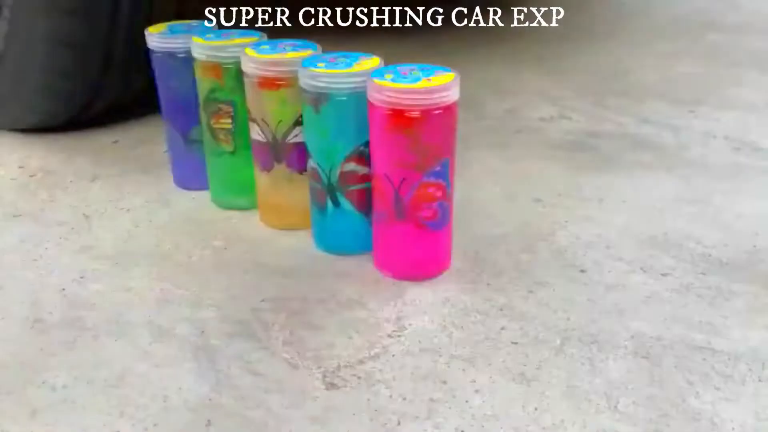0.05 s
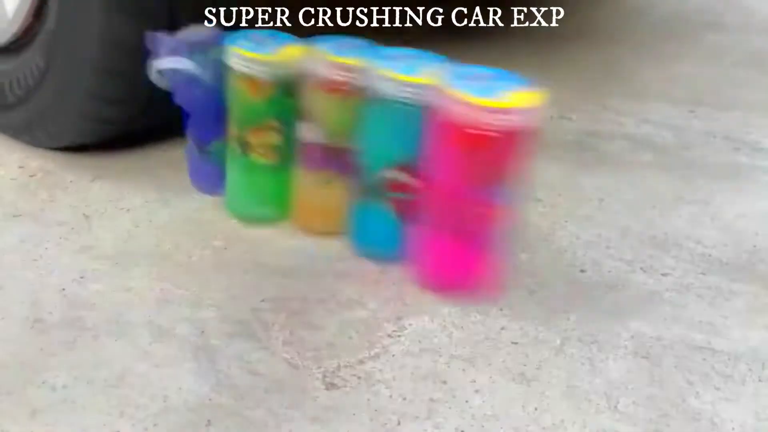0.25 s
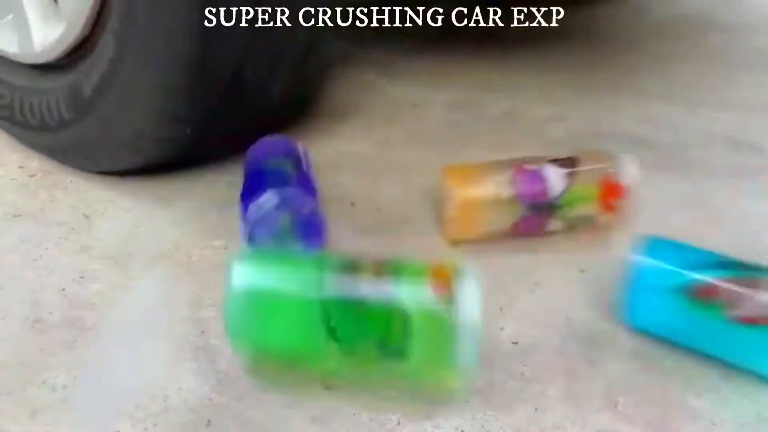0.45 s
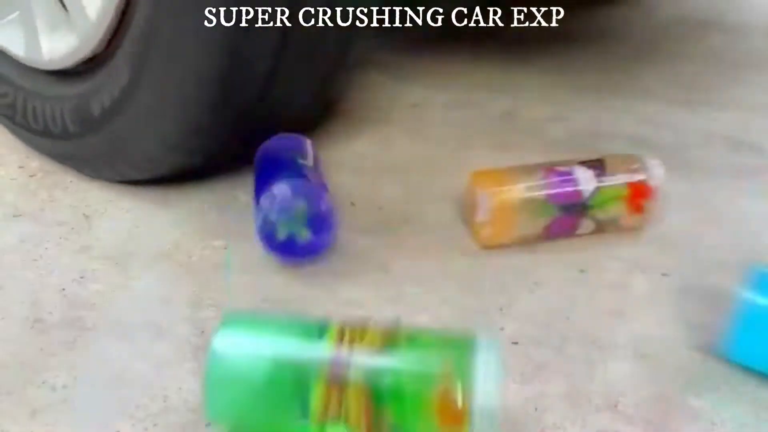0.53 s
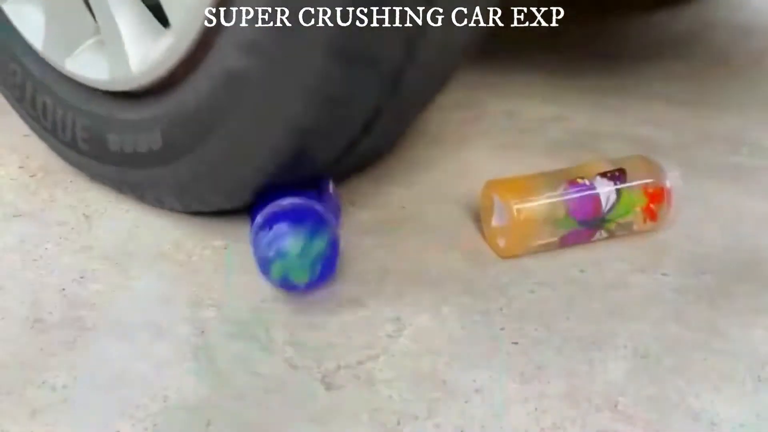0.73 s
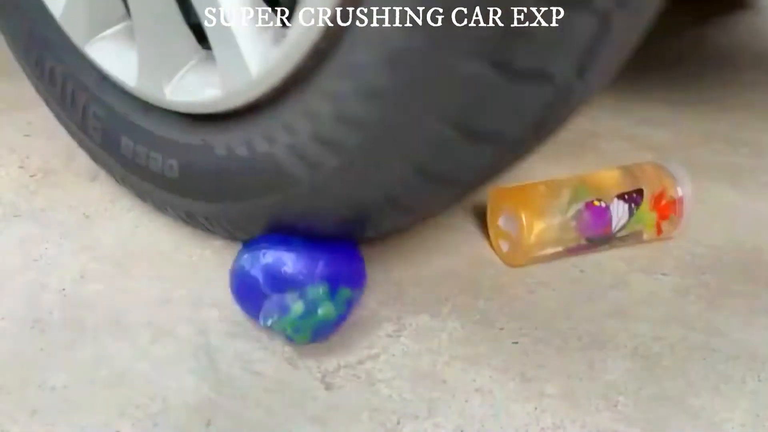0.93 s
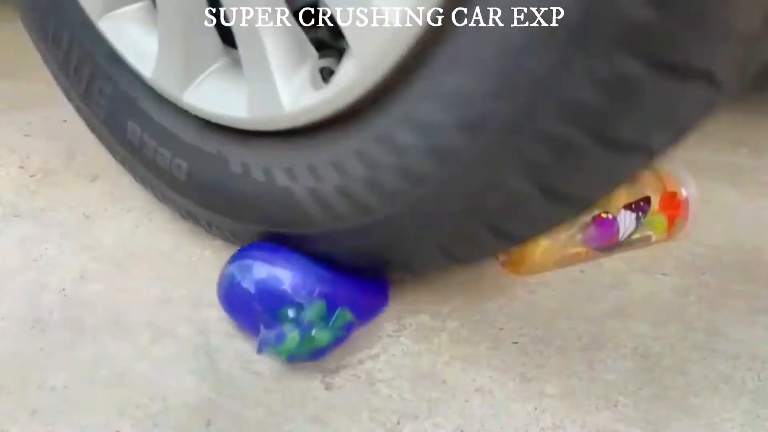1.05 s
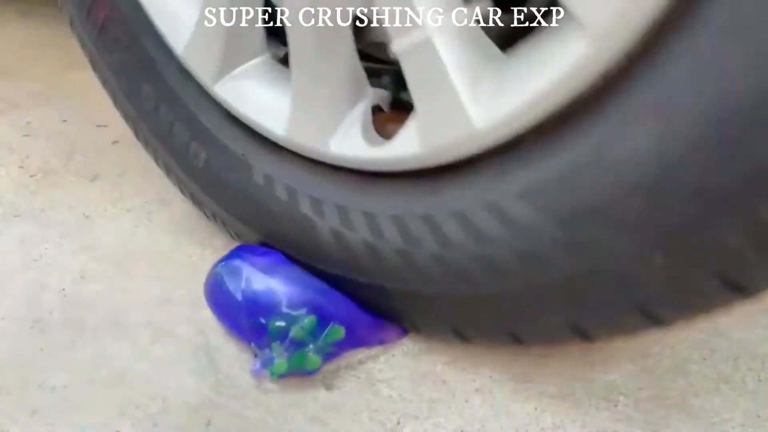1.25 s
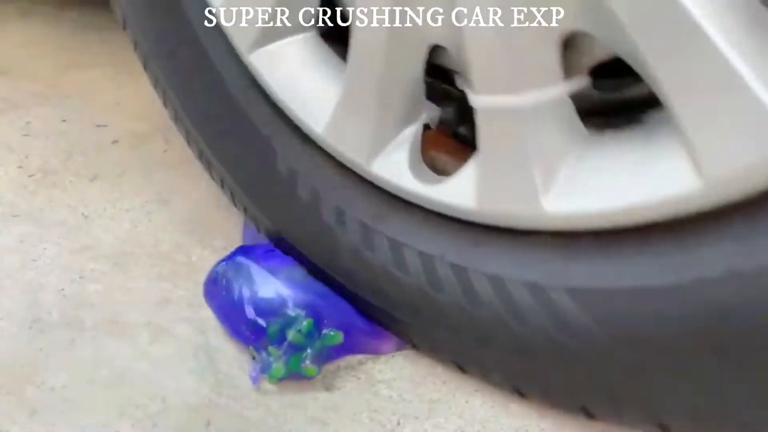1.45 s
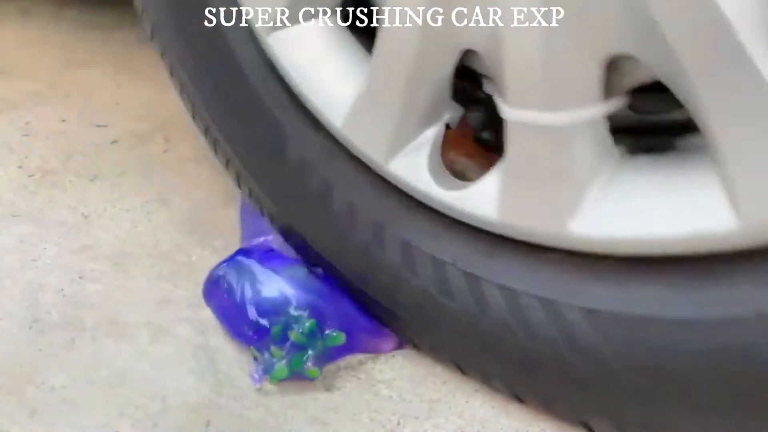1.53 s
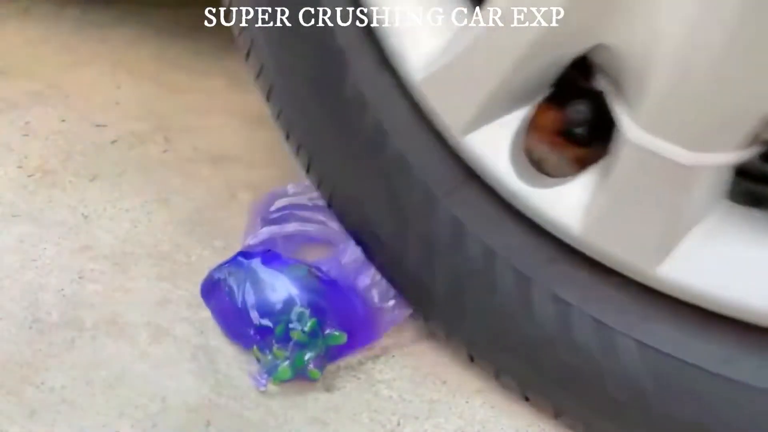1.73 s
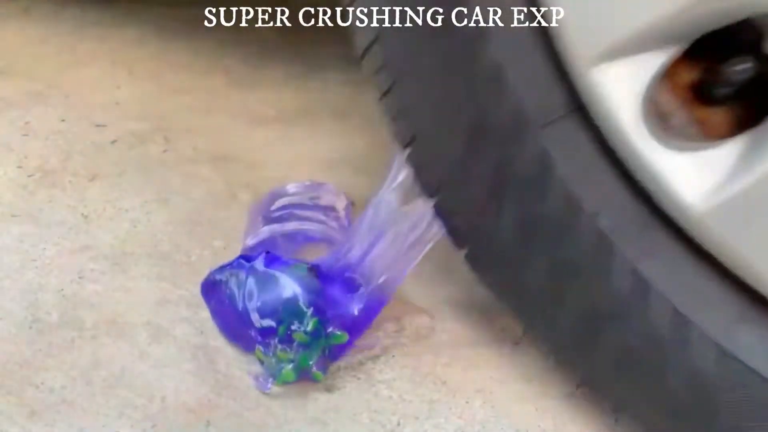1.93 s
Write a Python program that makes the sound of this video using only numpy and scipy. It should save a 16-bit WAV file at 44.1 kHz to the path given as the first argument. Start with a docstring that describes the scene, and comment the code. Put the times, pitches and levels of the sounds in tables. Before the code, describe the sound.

Plastic tubes crack, pop and squelch as a car tyre rolls over them.

```python
"""A tyre crushing gel-filled tubes

A car tyre thumps and rumbles over plastic tubes on concrete, close by, while the engine idles quietly.
The shells snap and knock, and trapped air shrieks out of split seals.
The gel spatters, flutters through a slit and pops."""
import sys
import numpy as np
from scipy import signal
from scipy.fft import rfft, irfft
from scipy.io import wavfile

SR = 44100
rng = np.random.default_rng(int(sys.argv[2]) if len(sys.argv) > 2 else 0)


def store_pcm(level_fs):
    """Save levels as 16-bit WAV."""
    pcm = np.round(np.clip(level_fs, -1, 1) * 32767).astype(np.int16)
    wavfile.write(sys.argv[1], SR, np.atleast_2d(pcm).T)


N = 88200
BLOW_SAMPLES = SR // 4
T = np.arange(N) / SR
HZ = np.maximum(np.fft.rfftfreq(N, 1 / SR), 1)

# Tone of droplets and grit: frequency_hz, level_db
PATTER_TONE = [(150, -8), (500, 0), (1100, -4), (1700, -1), (2600, 2.5), (4000, 0), (6000, -1), (7500, -4),
               (8900, 3), (10500, -4), (16000, -8)]
# Stereo width, sides against middle: frequency_hz, side_db
STEREO_WIDTH = [(40, -12), (130, -11), (400, -13), (2000, -18), (5000, -12), (14000, -11)]


def amp(db):
    """Decibels to gain."""
    return 10 ** (np.asarray(db) / 20)


def unit(x):
    """Scale to an average (rms) strength of 1."""
    return x / np.sqrt(np.mean(x ** 2) + 1e-20)


def gains(points, at=HZ):
    """A tone curve as a gain for every frequency."""
    hz, db = np.transpose(points)
    return amp(np.interp(np.log(at), np.log(hz), db))


def level(points):
    """A level curve as a gain for every sample."""
    return amp(np.interp(T, *np.transpose(points)))


def tilt(db_per_octave):
    """Brighten or dull the tone above 500 Hz."""
    return amp(db_per_octave * np.log2(np.maximum(HZ, 500) / 4000))


def colour(pair, gain):
    """Shape two unrelated signals into fairly narrow stereo."""
    mid, side = irfft(rfft(pair) * gain * [np.ones_like(HZ), gains(STEREO_WIDTH)], N)
    return unit(np.array([mid + side, mid - side]))


def noise(gain):
    """Stereo noise with a given tone."""
    return colour(rng.standard_normal((2, N)), gain)


def clicks(per_s, spread_db):
    """Random clicks of uneven size, as a pair."""
    sizes = amp(spread_db * np.minimum(rng.exponential(1, N), 4))
    happens = rng.random(N) < per_s / SR
    return unit(sizes * happens * rng.choice([-1, 1], (2, N)))


def decay(t, fade_s):
    """Silent before t = 0, then falling 60 dB every fade_s."""
    return (t >= 0) * np.exp(-np.log(1000) * np.clip(t / fade_s, 0, 10))


def swell(start_s, rise_s, hold_s, fade_s, db):
    """A level that rises, holds and fades."""
    rise = np.clip((T - start_s) / rise_s, 0, 1) ** 2
    return amp(db) * rise * decay(np.maximum(T - start_s - rise_s - hold_s, 0), fade_s)


def resonate(x, hz, width_hz):
    """Let a sound ring around one pitch."""
    r = np.exp(-np.pi * width_hz / SR)
    feedback = [1, -2 * r * np.cos(2 * np.pi * hz / SR), r * r]
    return signal.lfilter(np.array([1, 0, -1]) * (1 - r * r) / 2, feedback, x + 1e-18)


def add(out, start_s, sound):
    """Lay a short sound into the mix."""
    start = max(int(start_s * SR), 0)
    out[..., start:start + BLOW_SAMPLES] += sound[..., :N - start]


def burst(tone, centre_hz, fade_s, rise_s=.0005, hold_s=.0007):
    """A dying puff of noise; centre_hz scales the frequencies of its tone."""
    t = T[:BLOW_SAMPLES]
    hz = np.maximum(np.fft.rfftfreq(BLOW_SAMPLES, 1 / SR), 1)
    spectrum = rfft(rng.standard_normal((2, BLOW_SAMPLES))) * gains(tone, hz / centre_hz)
    mid, side = irfft(spectrum * [np.ones_like(hz), gains(STEREO_WIDTH, hz)], BLOW_SAMPLES)
    shape = np.minimum(t / rise_s, 1) * decay(np.maximum(t - hold_s, 0), fade_s)
    return unit(np.array([mid + side, mid - side]) * shape) * np.sqrt(np.mean(shape ** 2))


def ring(hz, fade_s):
    """One struck note dying away."""
    t = T[:BLOW_SAMPLES]
    return np.sin(2 * np.pi * hz * t) * decay(t, fade_s)


def yard(x, delay_s=.004):
    """Sound bounces off the car and the yard, leaving a faint, dull tail."""
    echoes = [(.06, -13, -2), (.3, -24, -2)]  # reflections: fade_s, level_db, tilt_db_per_octave
    tail = 0
    for fade_s, db, slope in echoes:
        echo = unit(noise(tilt(slope)) * decay(T - delay_s, fade_s))
        tail += amp(db) * echo * np.sqrt(np.mean(tilt(slope) ** 2) / N)
    return signal.fftconvolve(x, tail, axes=1)[:, :N]


def engine():
    """The idling engine fills the yard with quiet, low noise."""
    loudness = [(0, -49), (.13, -47), (.3, -38), (.42, -42), (.6, -39), (.8, -40), (1.2, -39), (1.6, -37),
                (1.8, -39), (2, -39)]  # idle level: time_s, level_db
    tone = [(20, -16), (45, -8), (80, 0), (130, -8), (250, -16), (600, -21), (1100, -30), (1800, -28),
            (4000, -33), (10000, -38), (16000, -44)]  # idle tone: frequency_hz, level_db
    return level(loudness) * noise(gains(tone))


def tyre(drone_hz=43, wander_share=.08, rumble_db=-7):
    """The loaded tyre drones and rumbles as grit crunches under its tread."""
    roll_level = [(0, -70), (.6, -54), (.68, -35), (.8, -42), (.88, -27), (.94, -26), (.99, -18),
                  (1.04, -27), (1.1, -21), (1.16, -31), (1.23, -28), (1.32, -42), (1.45, -58), (2, -60)]  # rolling: time_s, level_db
    rumble_tone = [(20, -8), (45, 0), (90, -1), (160, -14), (400, -24), (1500, -45), (16000, -80)]  # rumble: frequency_hz, level_db
    grit_level = [(0, -62), (.2, -60), (.5, -48), (.72, -48), (.87, -50), (1.05, -45), (1.13, -52),
                  (1.6, -45), (1.75, -48), (1.88, -54), (2, -56)]  # crunching: time_s, level_db
    wander = noise(1 / (1 + (HZ / 10) ** 4))[0]
    pitch_hz = drone_hz * (1 + wander_share * wander)
    drone = np.sqrt(2) * np.sin(2 * np.pi * np.cumsum(pitch_hz) / SR)
    grit = level(grit_level) * colour(clicks(per_s=700, spread_db=4.5), gains(PATTER_TONE))
    return level(roll_level) * (drone + amp(rumble_db) * noise(gains(rumble_tone))) + grit


def thumps(rise_s=.004):
    """The soft rubber drops on to a tube or the ground."""
    blows = [(.218, -19, 150, .08), (.277, -25, 120, .1), (.327, -14, 104, .13), (.37, -23, 140, .08),
             (.58, -27, 130, .08), (.635, -23, 48, .25), (.665, -29, 190, .12), (.836, -8, 50, .15),
             (.843, -13, 140, .08), (1.06, -20, 100, .07), (1.184, -9, 112, .08), (1.215, -11, 72, .18),
             (1.911, -27, 100, .1)]  # tyre landings: start_s, level_db, pitch_hz, fade_s
    out = np.zeros(N)
    for start_s, db, hz, fade_s in blows:
        add(out, start_s, amp(db) * ring(hz, fade_s) * np.minimum(T[:BLOW_SAMPLES] / rise_s, 1))
    return out


def flutter(flaps_per_s=224, jitter=.07, hiss_db=-6):
    """A wet slit flaps unevenly; each flap rings it and lets out a puff of hiss."""
    shape = (1.386, .012, .02, .14, -25)  # flutter level: start_s, rise_s, hold_s, fade_s, level_db
    slit_notes = [(260, 300, 1), (520, 400, -1), (1050, 500, 0), (1600, 450, -5), (2250, 700, -4)]  # ringing slit: pitch_hz, width_hz, level_db
    hiss_tone = [(1000, -15), (2500, -2), (4000, -2), (5800, 0), (6800, -16), (16000, -28)]  # puffs: frequency_hz, level_db
    times = shape[0] + np.cumsum(1 + jitter * rng.standard_normal(30)) / flaps_per_s
    flaps = np.zeros(N)
    flaps[(times * SR).astype(int)] = amp(rng.normal(0, 2, len(times)))
    body = sum((-1) ** k * amp(db) * resonate(resonate(flaps, hz, width), hz, width)
               for k, (hz, width, db) in enumerate(slit_notes))
    puffs = signal.fftconvolve(flaps, decay(T, fade_s=.012))[:N] * noise(gains(hiss_tone))
    active_share = np.ptp(times) / T[-1]
    return swell(*shape) * (unit(body) + amp(hiss_db) * unit(puffs)) * np.sqrt(active_share)


def spatter(mist_gain=.45):
    """Gel sprays out as dense droplets in a fine mist."""
    sprays = [(.249, .002, .008, .09, -26, 5), (.283, .007, .018, .24, -19, .5),
              (.474, .004, .01, .16, -30, 0), (.555, .01, .02, .08, -34, 0), (.62, .04, .09, .3, -44, 1),
              (1.176, .01, .008, .3, -23, 2), (1.27, .08, .06, .18, -35, -1.5),
              (1.457, .016, .028, .12, -35, 1), (1.59, .008, .008, .2, -38, -2),
              (1.745, .025, .012, .16, -39, 2)]  # spurts: start_s, rise_s, hold_s, fade_s, level_db, tilt_db_per_octave
    drops = clicks(per_s=2200, spread_db=4) + mist_gain * rng.standard_normal((2, N))
    return sum(swell(*shape) * colour(drops, gains(PATTER_TONE) * tilt(slope))
               for *shape, slope in sprays)


def air_jets():
    """Trapped air hisses through split seals and whistles at their edges."""
    # Each jet's level: start_s, rise_s, hold_s, fade_s, level_db
    # Its hiss: frequency_hz, level_db. Its whistles: pitch_hz, width_hz, level_db
    shriek = (.2322, .001, .0148, .025, -7.5)
    shriek_hiss = [(500, -38), (1200, -28), (2700, -10), (3900, -22), (5300, -11), (7000, -13), (8600, -3),
                   (9700, -7), (11000, -3), (16000, -6)]
    shriek_whistles = [(8560, 130, -3), (8920, 130, -11), (10480, 130, -10), (10830, 120, -8),
                       (13400, 200, -12)]
    blast = (1.143, .022, .005, .06, -8)
    blast_hiss = [(1000, -30), (3300, -24), (4600, -5), (7500, -6), (8900, 0), (10000, -4), (12000, 1),
                  (16000, 1)]
    blast_whistles = [(8850, 250, -12), (13660, 150, -12), (14520, 150, -8), (15080, 200, -8)]
    squirt = (1.345, .008, .009, .06, -11)
    squirt_hiss = [(500, -25), (2000, -16), (3500, -2), (5600, 0), (6600, -12), (8000, -14), (11000, -26),
                   (16000, -32)]
    squirt_whistles = [(4230, 100, -10), (4480, 70, -5), (5370, 80, -2)]
    gurgle = (1.353, .008, .006, .09, -19)  # the squirt turns wet and lower
    gurgle_hiss = [(200, -20), (700, -12), (1100, 0), (2500, 0), (3700, 0), (6000, -14), (16000, -35)]
    gurgle_whistles = [(1550, 80, -9), (2230, 90, -6), (2570, 60, -7)]
    seep = (1.455, .025, .022, .08, -30)  # a last thin leak before the pops
    seep_hiss = [(800, -14), (2400, -7), (4000, -10), (5600, 0), (7200, -2), (9000, -12), (16000, -22)]
    seep_whistles = [(1000, 200, -12), (2300, 250, -11), (6000, 300, -7)]
    jets = [(shriek, shriek_hiss, shriek_whistles), (blast, blast_hiss, blast_whistles),
            (squirt, squirt_hiss, squirt_whistles), (gurgle, gurgle_hiss, gurgle_whistles),
            (seep, seep_hiss, seep_whistles)]
    out = np.zeros((2, N))
    for shape, hiss, whistles in jets:
        tones = sum(amp(db) * noise(1 / (1 + (2 * (HZ - hz) / width) ** 2))
                    for hz, width, db in whistles)
        out += swell(*shape) * unit(noise(gains(hiss)) + tones)
    return out


def hollow(hz, fade_s, notes_db=-2, clatter_db=-5):
    """A hollow tube rings briefly amid a clatter of weaker notes."""
    notes = [(1.0, 0), (2.05, -8)]  # main notes: pitch_ratio, level_db
    clatter = [(.15, -26), (.4, -10), (.7, 0), (1.4, -1), (2.3, -3), (3.2, -15), (6, -30), (20, -60)]  # crowded weaker notes: pitch_ratio, level_db
    ringing = sum((-1) ** k * amp(db + notes_db) * ring(hz * ratio, fade_s / np.sqrt(ratio))
                  for k, (ratio, db) in enumerate(notes))
    return ringing + amp(clatter_db) * burst(clatter, hz, fade_s * 1.25)


def knocks_and_pops(low_cut_hz=170, bounce_db=-18, bounce_s=.0011):
    """Shells knock; gel pockets pop and ring the crushed tube; a ground echo widens them."""
    knocks = [(.1705, -31, 450, .03), (.221, -27, 320, .04), (.3295, -19, 480, .04),
              (.3415, -16, 540, .045), (.3725, -21, 400, .04), (.381, -24, 520, .03),
              (.4322, -11, 480, .035), (.452, -26, 420, .04), (.4692, -7, 460, .04), (.473, -9, 1000, .03),
              (.531, -18, 390, .05), (.555, -23, 600, .02), (.5755, -13, 560, .04), (.61, -12, 720, .018),
              (.671, -24, 440, .05), (.716, -28, 340, .05), (.808, -33, 420, .05), (.838, -26, 320, .09),
              (.922, -21, 310, .04), (1.004, -27, 320, .04), (1.059, -17, 480, .05),
              (1.184, -15, 470, .035), (1.746, -28, 300, .04), (1.7785, -22, 480, .035),
              (1.886, -30, 480, .07)]  # shell knocks: start_s, level_db, pitch_hz, fade_s
    pops = [(1.5006, -4, 680, .028, -26), (1.5115, -15, 600, .04, -33), (1.532, -15, 480, .025, -40),
            (1.5642, 2, 490, .025, -18), (1.638, -21, 330, .035, -44), (1.6552, -4, 400, .026, -15)]  # gel pops: start_s, level_db, pitch_hz, fade_s, tube_db
    tube_notes = [(300, 1, .07), (587, -1, .09), (735, 3, .075), (930, 0, .06), (1005, -3, .06),
                  (1310, -10, .06), (1670, -13, .05), (2055, -12, .06), (2610, -15, .05)]  # crushed tube: pitch_hz, level_db, fade_s
    out = np.zeros((2, N))
    for start_s, db, hz, fade_s in knocks:
        add(out, start_s, amp(db) * hollow(hz, fade_s))
    tube = sum((-1) ** k * amp(db) * ring(hz, fade_s) for k, (hz, db, fade_s) in enumerate(tube_notes))
    for start_s, db, hz, fade_s, tube_db in pops:
        add(out, start_s, amp(db) * hollow(hz, fade_s) + amp(tube_db) * tube)
    out = signal.sosfilt(signal.butter(2, low_cut_hz, "high", fs=SR, output="sos"), out)
    bounce = np.interp(T - bounce_s, T, out.mean(axis=0))
    return out + amp(bounce_db) * bounce * [[1], [-1]]


def snaps():
    """Plastic cracks in bursts of noise with a bright tick on top; a few stiff shards ping."""
    cracks = [(.1705, -47, 1500, -36, .03), (.2215, -42, 2200, -42, .03), (.2322, -15, 5500, -9, .025),
              (.2757, -13, 3000, -5, .018), (.2797, -29, 3000, -14, .015), (.3085, -19, 2800, -26, .015),
              (.3593, -26, 3500, -17, .015), (.381, -29, 2500, -27, .035), (.4318, -19, 3800, -10, .015),
              (.4348, -20, 3800, -11, .015), (.4382, -24, 2500, -19, .015), (.452, -31, 2600, -29, .03),
              (.4688, -18, 2200, -16, .025), (.473, -16, 3000, -6, .022), (.4812, -26, 2500, -20, .04),
              (.5303, -19, 3200, -9, .015), (.5385, -37, 3000, -30, .04), (.5545, -16, 3000, -13, .018),
              (.5653, -17, 3000, -14, .015), (.575, -20, 3800, -13, .025), (.586, -36, 3000, -32, .02),
              (.6098, -8, 3000, -15, .012), (.6151, -20, 4500, -11, .012), (.6622, -27, 4300, -41, .012),
              (.671, -41, 4000, -35, .04), (.7154, -37, 2500, -39, .02), (.7484, -26, 5400, -23, .022),
              (.7825, -35, 4000, -28, .012), (.788, -36, 4000, -34, .012), (.8072, -36, 3000, -34, .012),
              (.832, -38, 3000, -29, .04), (.89, -42, 4000, -26, .012), (.921, -39, 1800, -47, .03),
              (1.0582, -19, 3600, -20, .018), (1.098, -30, 5000, -39, .01), (1.1838, -13, 3500, -8, .016),
              (1.195, -23, 3000, -25, .04), (1.254, -29, 2500, -27, .04), (1.276, -28, 5000, -32, .06),
              (1.2985, -24, 4500, -33, .02), (1.3045, -21, 2800, -42, .012), (1.3235, -27, 4000, -27, .04),
              (1.5006, -20, 2000, -31, .025), (1.5638, -9, 2400, -30, .03), (1.579, -19, 2000, -50, .06),
              (1.623, -36, 2500, -44, .025), (1.6552, -22, 1800, -28, .025), (1.732, -33, 4300, -44, .012),
              (1.7785, -25, 2200, -35, .025), (1.887, -44, 2000, -55, .08)]  # breaks: start_s, level_db, centre_hz, tick_db, fade_s
    crack_tone = [(.1, -20), (.3, -9), (.6, -2), (1, 0), (1.6, -3), (2.5, -13), (4, -23), (8, -38)]  # body of a crack: ratio_to_centre, level_db
    tick_tone = [(2000, -30), (5000, -12), (7000, -4), (9000, 0), (11500, 0), (14000, -3), (16000, -8)]  # its bright top: frequency_hz, level_db
    pings = [(.6622, -19, 4250, .014), (1.0586, -16, 7100, .016), (.2965, -20, 3600, .03),
             (.61, -15, 5400, .012)]  # shards: start_s, level_db, pitch_hz, fade_s
    out = np.zeros((2, N))
    for start_s, db, hz, tick_db, fade_s in cracks:
        crack = amp(db) * burst(crack_tone, hz, fade_s)
        add(out, start_s, crack + amp(tick_db) * burst(tick_tone, 1, fade_s))
    for start_s, db, hz, fade_s in pings:
        add(out, start_s, amp(db) * ring(hz, fade_s))
    return out


def scene():
    """Tubes burst under the tyre, over the idling engine."""
    near = snaps() + knocks_and_pops() + air_jets() + spatter() + flutter() + thumps() + tyre()
    return near + yard(near) + engine()


def record(dry, ceiling=1.3, cutoff_hz=16100):
    """Round off the loudest peaks and cut the highest treble."""
    rounded = ceiling * np.tanh(dry / ceiling)
    return signal.sosfilt(signal.ellip(10, .1, 70, cutoff_hz, fs=SR, output="sos"), rounded)


dry = scene()
out = record(dry)
store_pcm(out)
```